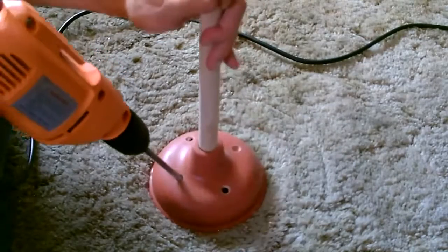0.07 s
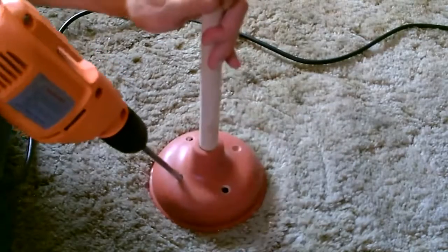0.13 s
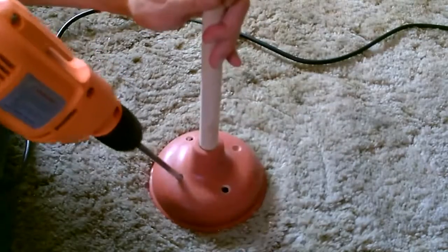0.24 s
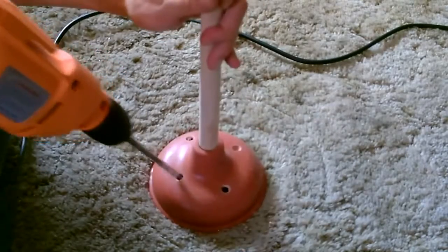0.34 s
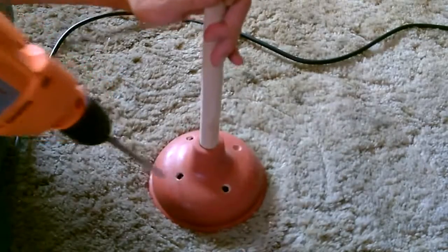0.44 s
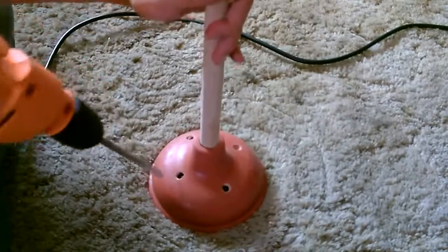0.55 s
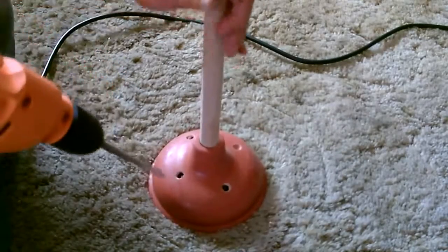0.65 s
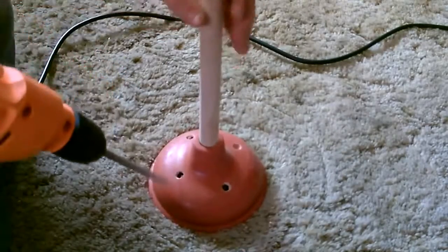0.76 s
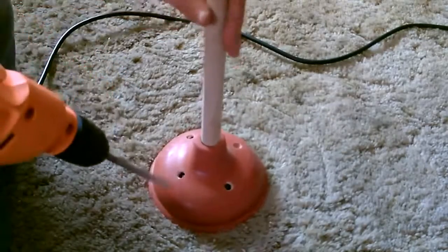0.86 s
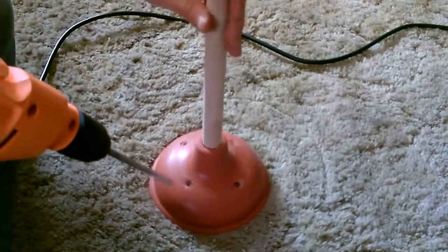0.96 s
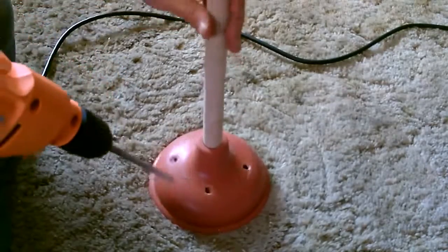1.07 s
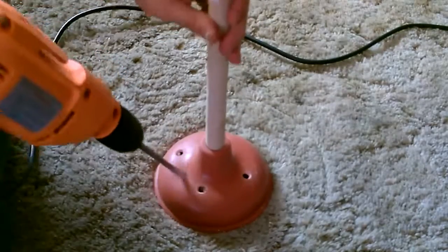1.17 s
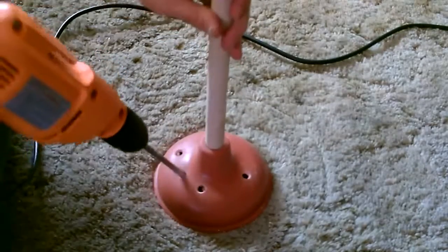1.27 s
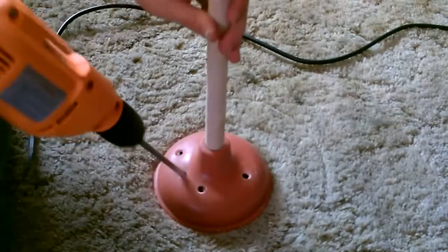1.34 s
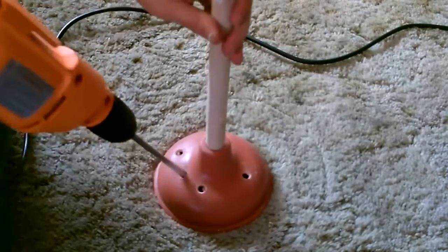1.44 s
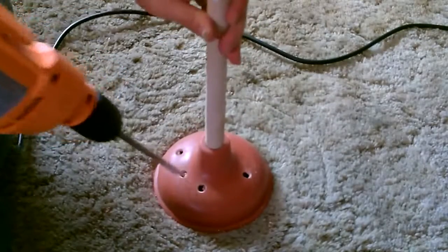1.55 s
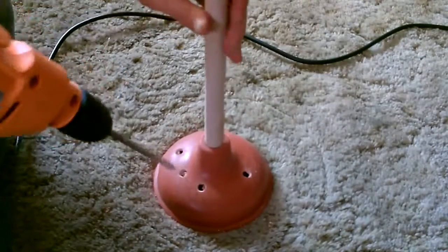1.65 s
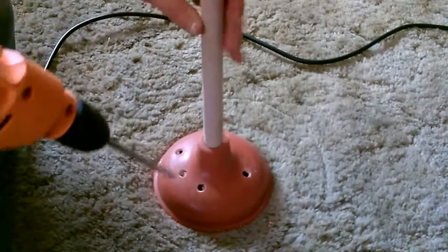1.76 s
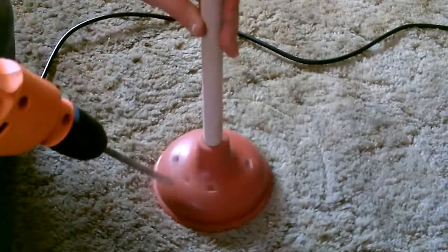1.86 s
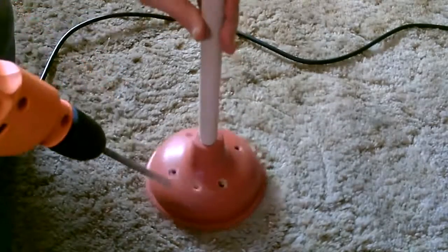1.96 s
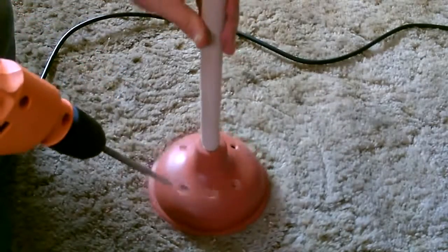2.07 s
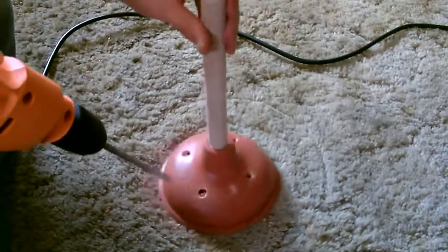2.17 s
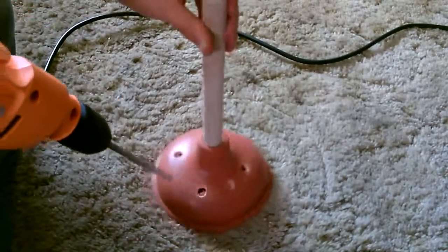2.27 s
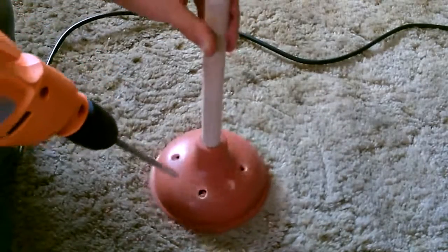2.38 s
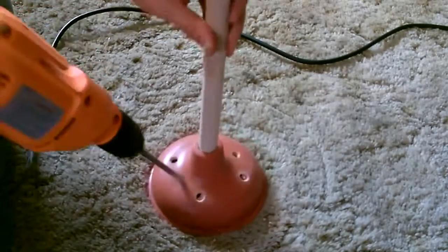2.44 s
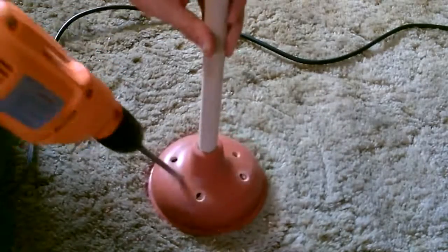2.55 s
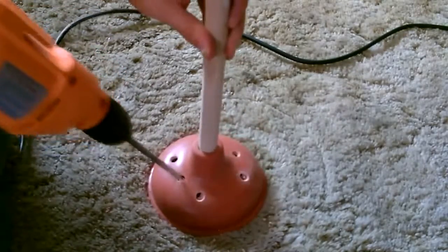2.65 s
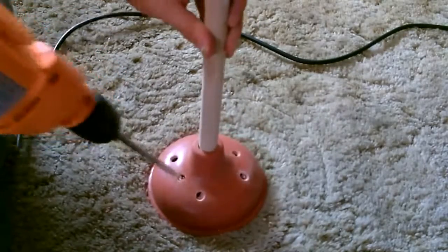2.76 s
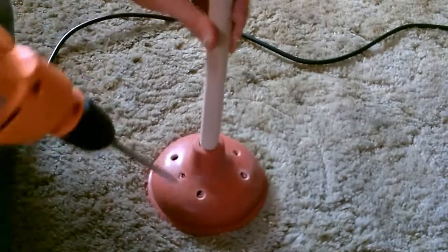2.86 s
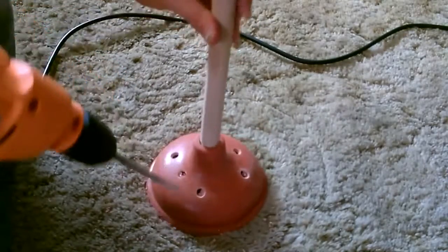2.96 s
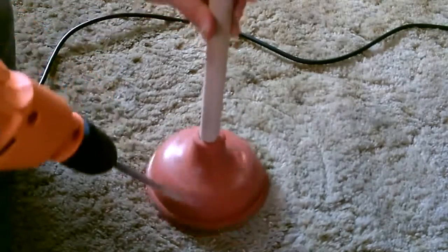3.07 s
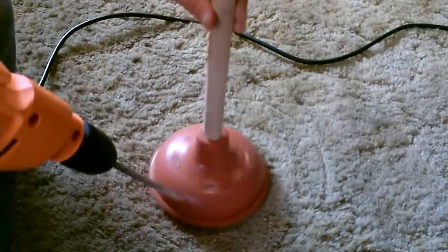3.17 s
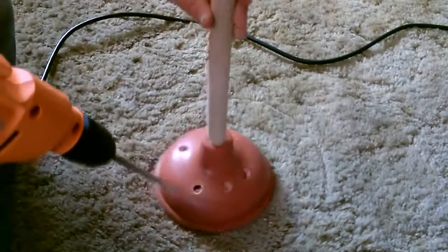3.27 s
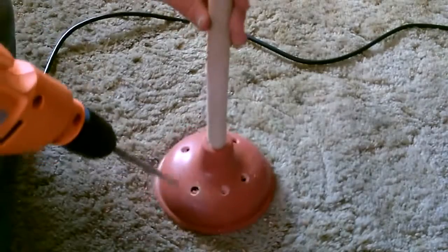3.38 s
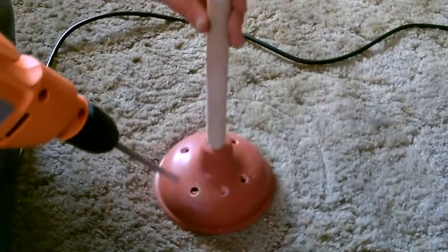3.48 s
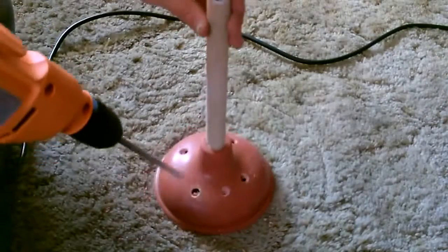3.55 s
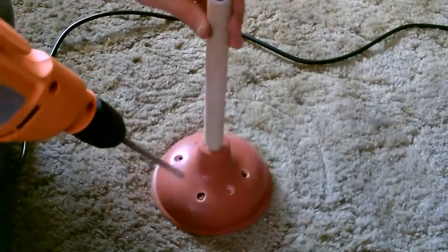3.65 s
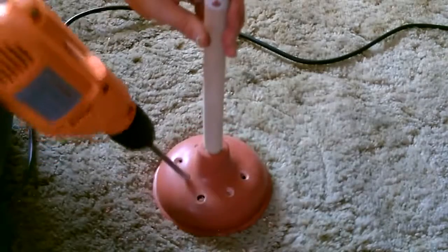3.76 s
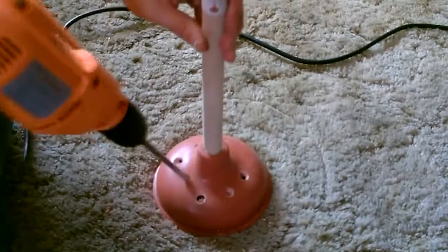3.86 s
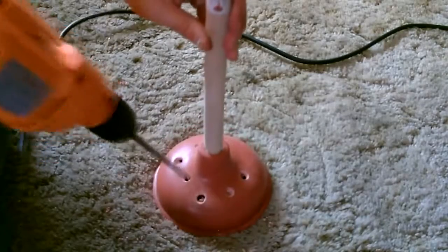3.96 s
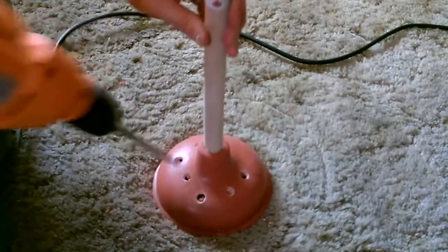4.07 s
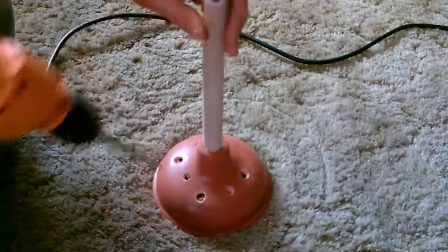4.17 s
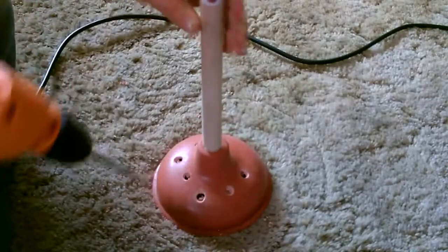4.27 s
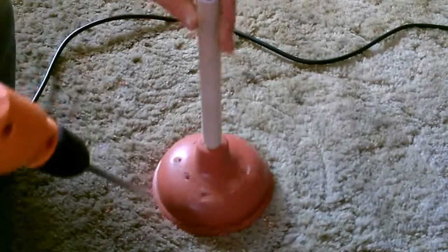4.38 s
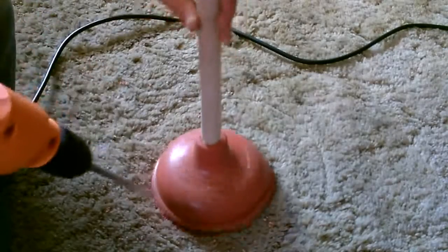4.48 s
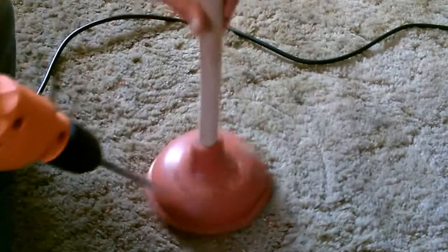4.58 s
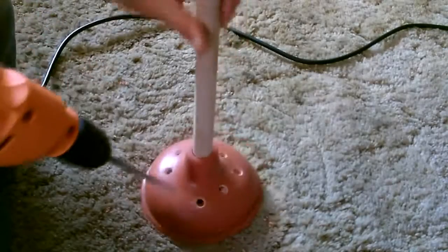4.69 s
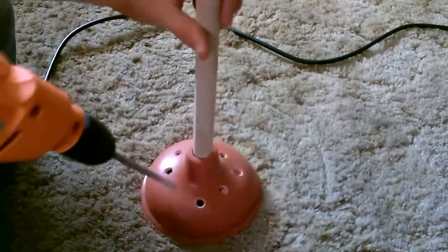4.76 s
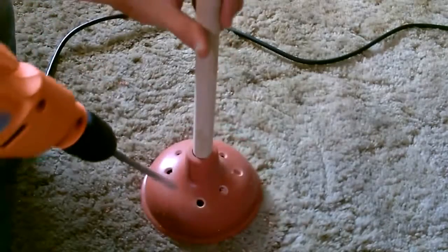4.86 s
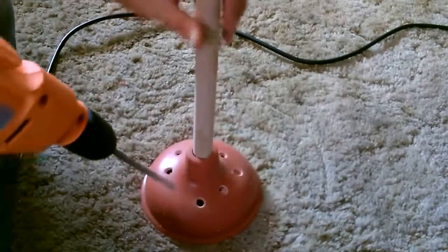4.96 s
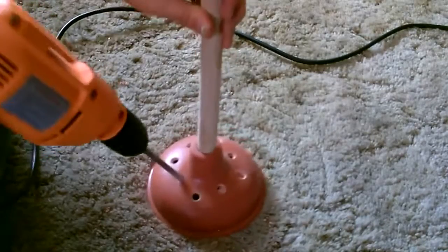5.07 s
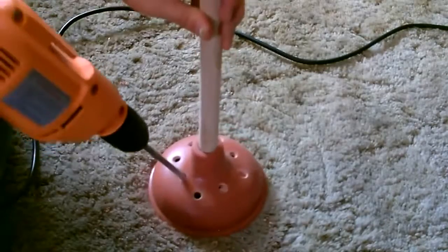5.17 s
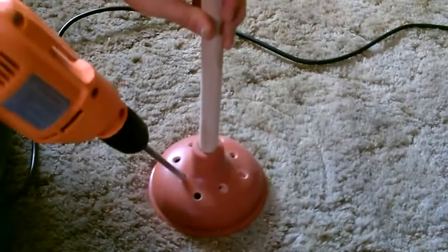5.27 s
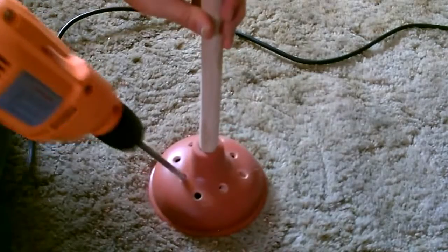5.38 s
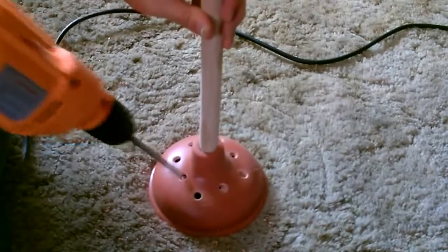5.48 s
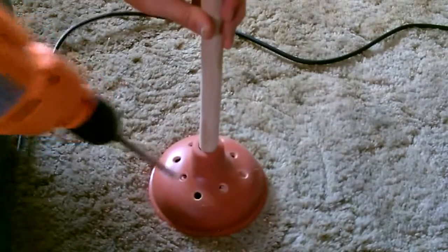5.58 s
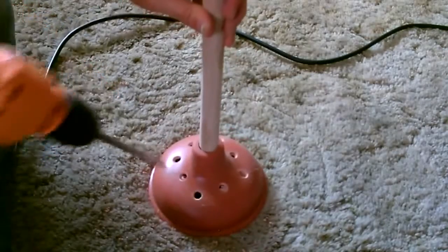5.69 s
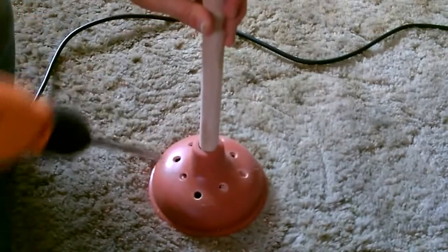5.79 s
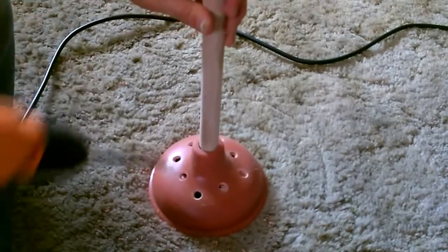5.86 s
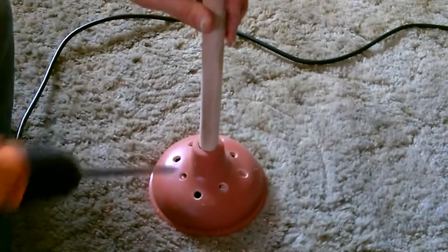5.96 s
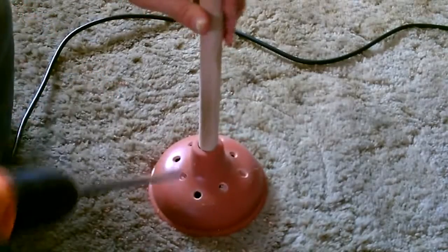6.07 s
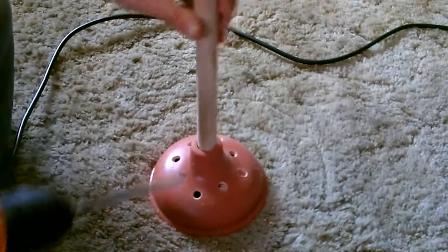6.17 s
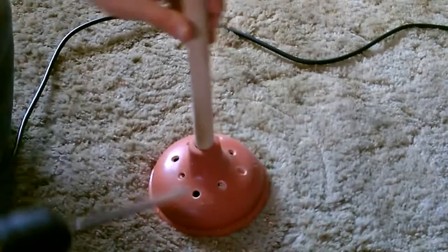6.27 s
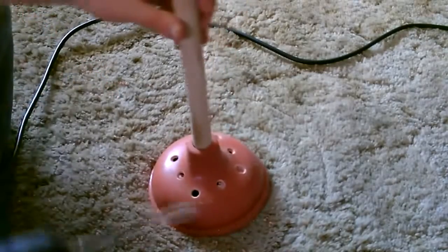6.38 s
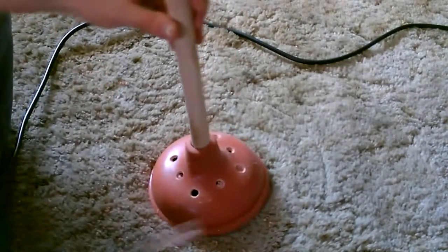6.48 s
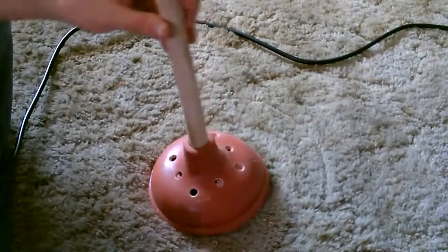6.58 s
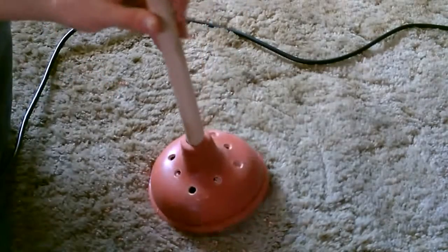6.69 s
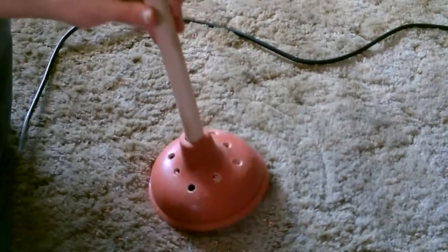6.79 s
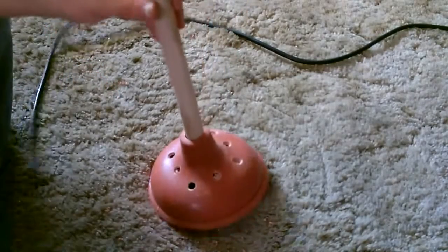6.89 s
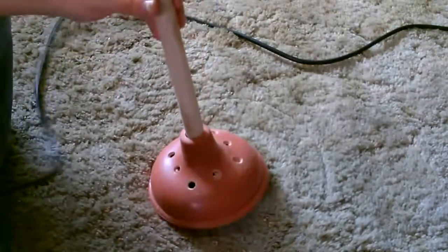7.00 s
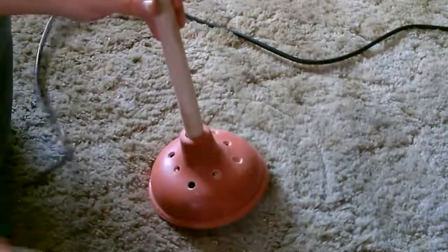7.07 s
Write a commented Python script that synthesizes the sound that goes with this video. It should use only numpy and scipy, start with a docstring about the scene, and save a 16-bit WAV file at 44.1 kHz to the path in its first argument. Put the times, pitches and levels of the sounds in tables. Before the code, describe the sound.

A corded electric drill runs five times, close to the microphone in a quiet carpeted room. Each run is a brief full-power whir with rushing air and hiss, followed by a longer coast in which the whine falls and loose gears rattle. Each new run cuts in abruptly before the motor has stopped. The last one winds down longest, sinking to a low whir and light ticking.

```python
"""A corded drill coasting down

A drill runs five times, close by on a carpet: full power for a moment, then a long coast.
As friction and air drag slow the rotor, its shaft orders whine downward and the loose gears rattle
over air, gear and brush noise in a quiet room. Each run is spliced hard onto the one before,
and a camera with a low sampling rate dulls the treble and mirrors it upward."""
import sys
import numpy as np
from scipy import signal
from scipy.fft import rfft, irfft, next_fast_len
from scipy.io import wavfile
from scipy.ndimage import uniform_filter1d, map_coordinates

SR = 44100
rng = np.random.default_rng(int(sys.argv[2]) if len(sys.argv) > 2 else 0)


def generate_wav(sig):
    """Save sig (samples, or channels by samples) to the path in sys.argv[1] as 16-bit PCM at SR."""
    pcm = np.round(np.clip(np.atleast_2d(sig).T, -1, 1) * 32767).astype(np.int16)
    wavfile.write(sys.argv[1], SR, pcm)


N = 314433

# Each row: start in seconds, trigger release in seconds, shaft speed under power in Hz,
# deceleration by friction in Hz per second.
RUNS = [(0, .4, 671.8, 206.1), (1.19, 1.5, 570, 207.9), (2.495, 2.7, 631, 200.4),
        (3.791, 3.98, 540.1, 196.3), (5.093, 5.52, 577.7, 195.9)]


def motor_noise(level_db):
    """Source and filter: cooling air, meshing gears and sparking brushes excite the plastic shell."""
    # Noise spectra. Each row: frequency in Hz, relative density in dB.
    air_spectrum = [(71, -78), (120, -43.5), (461, -10), (492, -9.5), (642, -6), (757, -6), (1090, -1),
                    (1620, -11), (1840, -5.5), (2500, -11.5), (3250, -41), (5500, -120)]
    gear_spectrum = [(820, -31), (1400, -0.5), (1930, -0.5), (2090, -1.5), (2560, 0), (2780, 3.5),
                     (3480, -11), (4090, 0), (4770, -5), (6430, -13.5), (8000, -11.5), (10400, -45),
                     (17600, -120)]
    brush_spectrum = [(2000, -33), (2700, 5.5), (3100, 12), (3700, 7.5), (4600, -0.5), (6000, -5),
                      (7000, -6.5), (8300, -12.5), (8600, 2), (9000, 5.5), (9600, -4), (11000, -17.5),
                      (11100, -72)]
    # Shell resonances. Each row: centre in Hz, width in Hz, gain in dB.
    modes = [(525, 18, 1), (755, 18, 5.5), (887, 40, 3.5), (1028, 88, 3.5), (1298, 18, 5),
             (1890, 140, -3.5), (2480, 77, -2.5), (3063, 60, 4.5), (3626, 230, 4.5), (5290, 740, 5.5)]
    roar_db, hiss_db, fizz_db = level_db[:3] + 0.65 * np.array([wobble(6), wobble(6), wobble(6)])
    roar = amp(roar_db - 2) * rush(air_spectrum, patchy_db=1.32, flutter_db=-0.7)
    hiss = amp(hiss_db - 4) * rush(gear_spectrum, patchy_db=2.5, flutter_db=1)
    fizz = amp(fizz_db + 8) * rush(brush_spectrum, patchy_db=2.1, flutter_db=1.5)
    shell = lambda hz: amp(sum(db / (1 + (2 * (hz - mid) / width) ** 2) for mid, width, db in modes))
    return filtered(roar + hiss + fizz, shell)


def whine(level_db):
    """Periodic forcing: blades and teeth sound at multiples of the shaft speed as the rotor coasts."""
    # Transmission out of the case. Each row: frequency in Hz, gain in dB.
    vents = [(250, -52), (480, -24), (1500, -26), (2300, -12), (3100, -6), (4000, -3), (4800, -3),
             (5400, -10), (6000, -18), (6800, -27), (9600, -31), (12000, -50)]
    # Fan overtones, then unbalance and tooth meshes. Each entry: shaft order, relative level in dB.
    fan_orders = {22: 0, 33: -1, 44: -3, 55: -8}
    gear_orders = {1: 13, 5: -1, 6: 6, 10: -1, 16: 2, 27: -6, 49: -8}
    blades, echo_s, lifted_s = 11, 1 / 730, 6.4
    fan_db, overtone_db, gear_db = level_db[3:]
    _, since_release, shaft_hz = rotor()
    turns = np.cumsum(shaft_hz) / SR
    t = np.arange(N) / SR
    reflection = 0.4 * np.clip((lifted_s - t) / 0.26, 0, 1)  # fades as the drill is lifted

    def floor_comb(order):
        """Interference with the floor's echo weakens evenly spaced frequencies."""
        return np.abs(1 - reflection * np.exp(2j * np.pi * order * shaft_hz * echo_s))

    def tone(order, db):
        """One shaft order, coloured by the case and wavering in level and phase."""
        gain = amp(db + along(vents, order * shaft_hz) + 1.8 * wobble(16))
        return gain * np.sin(2 * np.pi * order * turns + 0.75 * wobble(60))

    fan = floor_comb(blades) * tone(blades, fan_db)
    overtones = sum(floor_comb(k) * tone(k, overtone_db + db) for k, db in fan_orders.items())
    gears = sum(tone(k, gear_db + db) for k, db in gear_orders.items())
    coasting = np.clip(since_release / 0.057, 0, 1)
    return coasting * (fan + overtones + gears)


def gear_rattle(level_db):
    """Backlash: loose teeth give clear knocks and, between them, a fairly even, slowing rattle."""
    # Clear knocks. Each row: start in seconds, relative peak in dB, centre in Hz.
    knocks = [(0.1277, -11.5, 3060), (0.4454, -12, 2660), (0.4639, -20, 3240), (0.6986, -12.5, 3320),
              (0.7592, -26, 2600), (0.8335, -16.5, 2450), (0.8947, -19, 2810), (0.9717, -10, 3710),
              (1.0397, -14.5, 3710), (1.088, -10.5, 4000), (1.1314, -17.5, 4160), (1.2037, -7, 2980),
              (1.322, -6, 3260), (1.4292, -15, 3070), (1.6417, -12, 2970), (1.767, -13, 3120),
              (1.795, -14, 2790), (1.8146, -13, 2940), (1.836, -14, 2800), (1.9792, -12, 4140),
              (2.3105, -18.5, 2820), (2.3313, -16, 2710), (2.4797, -18.5, 3630), (2.4953, -12, 4100),
              (2.5374, -12, 3260), (2.7033, -10, 2450), (2.7515, -10.5, 3280), (2.7751, -17, 3570),
              (2.8929, -12, 2880), (2.9717, -16, 2920), (3.004, -11.5, 3930), (3.0294, -12.5, 3000),
              (3.056, -11, 3710), (3.1004, -12.5, 3660), (3.1218, -15, 3740), (3.1346, -7.5, 3070),
              (3.1588, -13, 2760), (3.177, -9.5, 3220), (3.1982, -15, 3800), (3.2184, -11, 3140),
              (3.2406, -14, 3820), (3.259, -12.5, 3170), (3.2865, -13, 4040), (3.5168, -14, 2840),
              (3.5726, -16.5, 2850), (3.6145, -16.5, 2560), (3.7414, -19, 2810), (3.7744, -20, 2650),
              (3.7915, -22, 3430), (3.8215, -7, 3050), (4.0178, -13, 3060), (4.078, -15, 2520),
              (4.1036, -7.5, 2920), (4.1266, -12, 2870), (4.2687, -22, 2700), (4.2856, -18, 4090),
              (4.302, -10, 3710), (4.4139, -12, 4170), (4.4324, -11, 4080), (4.5032, -14, 3800),
              (4.6898, -16, 2910), (4.7212, -15, 3120), (4.7387, -20, 3780), (4.811, -13.5, 2810),
              (4.9352, -18, 2790), (5.0964, -7, 3270), (5.172, -9, 3200), (5.4111, -11, 3030),
              (5.632, -12.5, 2980), (5.6546, -13, 2860), (5.6731, -15, 2970), (5.715, -18, 3020),
              (5.7334, -12.5, 2730), (5.8676, -13, 3710), (5.8871, -8, 3700), (5.9193, -16, 3390),
              (5.9868, -9.5, 3370), (6.0262, -12, 3280), (6.0467, -12.5, 4160), (6.1026, -11.5, 3960),
              (6.211, -14.5, 2870), (6.2343, -13, 4080), (6.2552, -17, 3090), (6.4368, -15.5, 3530),
              (6.4578, -17, 2800), (6.4874, -27, 2950), (6.5168, -25, 3790), (6.5338, -17, 3700),
              (6.5477, -20, 3040), (6.5846, -22.5, 2370), (6.6709, -19.5, 4200), (6.7044, -20.5, 3100),
              (6.7283, -26.5, 3680), (6.9109, -26, 2910), (6.9438, -26, 3170), (6.9688, -19, 2870),
              (7.0571, -30, 2490), (7.0805, -25, 2570), (7.101, -23, 2770)]
    # Each row: shaft speed in Hz, ticks per second.
    tick_rates = [(80, 36), (250, 42), (400, 54), (680, 52)]
    # Each row: shaft speed in Hz, dB added to the level curve of the gear hiss.
    tick_levels = [(80, 11), (200, 13), (300, 13), (400, 11.5), (500, 10.5), (600, 5.5)]
    scatter_s, spread_db, clearance_s = 0.002, 1.8, 0.011
    clear, ticks = np.zeros(N + SR), np.zeros(N + SR)
    for start, db, hz in knocks:
        knock = amp(db - 0.75) * tooth_knock(hz, t60=0.0082)
        clear[round(start * SR):][:len(knock)] += knock
    clear_starts = np.array(knocks)[:, 0]
    _, _, shaft_hz = rotor()
    tick_count = np.floor(np.cumsum(curves(tick_rates, shaft_hz)[0]) / SR)
    for start in np.flatnonzero(np.diff(tick_count)) / SR:
        late, size, pitch = rng.standard_normal(3)
        tick = amp(spread_db * size) * tooth_knock(3250 * np.exp(0.1 * pitch), t60=0.011)
        if np.abs(clear_starts - start).min() > clearance_s:
            onset = max(round((start + scatter_s * late) * SR), 0)
            ticks[onset:][:len(tick)] += tick
    tick_gain = amp(level_db[1] + curves(tick_levels, shaft_hz)[0])
    return clear[:N] + tick_gain * ticks[:N]


def tooth_knock(hz, t60):
    """Impact excitation: a tooth slaps back and housing modes near hz ring over a broad tick; peak 1."""
    # Modes of the gear housing in Hz.
    modes_hz = np.array([2146, 2474, 2867, 3207, 3740, 4073, 4730])
    noise = rng.standard_normal(600)
    t = np.arange(len(noise)) / SR
    sizes = amp(-32 * np.abs(np.log(modes_hz / hz)) + 3.5 * noise[:len(modes_hz)])
    phases = 3 * noise[-len(modes_hz):, None]
    ring = sizes @ np.sin(2 * np.pi * modes_hz[:, None] * t + phases)
    contact_band = signal.butter(4, [1100, 5200], btype="band", fs=SR, output="sos")
    contact = 0.5 * unit(signal.sosfilt(contact_band, noise))
    envelope = amp(-60 * t / t60) * (1 - np.exp(-t / 0.0007))
    burst = (ring + contact) * envelope
    return burst / np.abs(burst).max()


def rotor():
    """Friction and linear drag slow the shaft. Per sample: run, seconds since release, speed in Hz."""
    drag_per_s = 0.365  # air drag of the fan
    t = np.arange(N) / SR
    start, release, powered_hz, friction = np.transpose(RUNS)
    run = np.searchsorted(start, t, side="right") - 1
    since_release = t - release[run]
    friction_hz = friction[run] / drag_per_s
    decay = np.exp(-drag_per_s * np.maximum(since_release, 0))
    return run, since_release, (powered_hz[run] + friction_hz) * decay - friction_hz


def levels():
    """Radiation follows speed: relative dB of roar, hiss, fizz, fan tone, fan overtones, gear tones."""
    # Each row: shaft speed in Hz, then the six levels in dB while coasting.
    coasting = [(80, -66, -45.5, -72, -43, -54, -47), (153, -54.5, -38, -64, -37, -42, -52),
                (229, -46, -35, -51.5, -33, -43, -37.5), (293, -40.5, -32.5, -51, -34, -34, -46.5),
                (332, -37, -30, -48.5, -26.5, -41, -41.5), (365, -35, -31.5, -46, -28.5, -40, -36.5),
                (413, -31.5, -29.5, -45, -28, -39, -40.5), (510, -27.5, -26.5, -43, -32, -43, -46.5),
                (587, -24.5, -24.5, -38.5, -34, -41, -44), (680, -20, -23.5, -37.5, -35, -44, -42)]
    # The drill swings away. Each row: time in seconds, then dB added to the six coasting levels.
    swing = [(5.85, 1.9, 0.17, 0, 1, 4.5, 0.7), (6.05, 2.5, 2.5, 1, 5, 4, 8),
             (6.22, 3, -1.5, 3.5, -11, 15, 5), (6.35, 4.5, 1.5, -3.5, 11.5, 15, 12),
             (6.5, 5.5, 3.5, -1, -6, 19, -1), (6.63, 7, 2.5, 1, 9, 8, -4), (6.7, 4, 5, 2.5, -8, 1, -7),
             (6.95, 9, 3.5, 6, 4, 5, 0), (7.13, 1, 5, 7, 2, 0.1, 0)]
    # Under power. Each row, one per run: roar at the start, roar at release, hiss, fizz, all in dB.
    powered = [(-20.5, -18, -23, -33), (-22.5, -20, -22, -31.5), (-18.5, -19.5, -20, -31),
               (-21.5, -22, -25, -32), (-19.5, -22, -23, -32.5)]
    # Each row, one per run: lift of the fan tone in dB, lift of the gear tones at release in dB.
    tone_lifts = [(0, 10), (0, 1), (0, 5), (0, 3), (1.5, -3)]
    lead_s, fade_s = 0.04, 0.081  # power starts to fade just before release
    slack_db, slack_s, settle_s = -2.5, 0.11, 0.5
    run, since_release, shaft_hz = rotor()
    first_db, last_db, hiss_db, fizz_db = np.array(powered)[run].T
    fan_lift_db, gear_lift_db = np.array(tone_lifts)[run].T
    powered_s = np.array([release - start for start, release, *_ in RUNS])[run]
    roar_db = last_db + (last_db - first_db) * np.minimum(since_release, 0) / powered_s
    power_off = np.clip((since_release + lead_s) / fade_s, 0, 1)
    level_db = curves(coasting, shaft_hz) + curves(swing, np.arange(N) / SR)
    # Hiss and fizz dip while the gears unload.
    level_db[1:3] += slack_db * np.exp(-np.maximum(since_release, 0) / slack_s)
    level_db[:3] = power_off * level_db[:3] + (1 - power_off) * [roar_db, hiss_db, fizz_db]
    level_db[3] += fan_lift_db
    level_db[5] += gear_lift_db * np.clip(2 - 2 * since_release / settle_s, 0, 1)
    return level_db


def room_hum():
    """Ambient noise: a quiet, fluttering band, strongest in the low midrange."""
    # Each row: frequency in Hz, relative density in dB.
    spectrum = [(15, -71), (25, -45), (70, -44), (248, -17), (484, -10), (537, -13), (626, 0.5),
                (810, -12.5), (1500, -15.5), (1950, -27.5), (3300, -120)]
    return amp(-54.5) * rush(spectrum, patchy_db=3, flutter_db=4.7)


def rush(spectrum, patchy_db, flutter_db):
    """Modulated noise of rms 1: random patches of gain in time and frequency, and a fast flutter."""
    bins = signal.stft(rng.standard_normal(N), nperseg=512)[2]
    patches = uniform_filter1d(rng.standard_normal(bins.shape), size=4, axis=0)
    patches = uniform_filter1d(patches, size=7, axis=1)
    noise = signal.istft(bins * amp(patchy_db * unit(patches)), nperseg=512)[1][:N]
    flutter = amp(flutter_db * wobble(120))
    return unit(filtered(flutter * noise, lambda hz: amp(along(spectrum, hz))))


def wobble(rate):
    """A smooth random curve with rate knots per second."""
    knots = rng.standard_normal(int(N * rate / SR) + 4)
    return map_coordinates(knots, [np.arange(N) * rate / SR])


def filtered(x, response):
    """Zero-phase filtering: the spectrum of x times response(hz)."""
    size = next_fast_len(N + SR // 2)
    return irfft(rfft(x, size) * response(np.fft.rfftfreq(size, 1 / SR)), size)[..., :N]


def along(points, hz):
    """Interpolation of (Hz, value) points on a logarithmic frequency axis."""
    point_hz, values = np.transpose(points)
    return np.interp(np.log(hz + 1), np.log(point_hz + 1), values)


def curves(rows, at):
    """Linear interpolation of each later column against the first."""
    axis, *columns = np.transpose(rows)
    return np.array([np.interp(at, axis, column) for column in columns])


def amp(db):
    """Amplitude ratio of a level in dB."""
    return 10 ** (np.asarray(db) / 20)


def unit(x):
    """Normalisation to rms 1."""
    return x / np.sqrt(np.mean(x ** 2) + 1e-20)


def scene():
    """Superposition of the drill and the room in one channel."""
    level_db = levels()
    return (motor_noise(level_db) + whine(level_db) + gear_rattle(level_db) + room_hum())[None]


def record(dry):
    """Spectral imaging: the camera dulls the treble and mirrors it about SR / 4; splices dip to zero."""
    # Leak of the mirrored band. Each row: frequency in Hz, gain in dB.
    leak = [(10900, -85), (11100, 17.5), (12300, -11), (13400, -31.5), (13700, -38), (15800, -39)]
    # Each row: time, fade-out and fade-in, all in seconds.
    splices = [(1.1882, 0.0053, 0.0056), (2.494, .003, 0.0025), (3.79, 0.0029, .0003),
               (5.092, 0.004, .0003)]
    bass_hz, edge_hz, top_hz = 130, 9620, 17000  # the small microphone also loses bass
    dull = filtered(dry, lambda hz: np.where(hz < edge_hz, 1, amp(-24) * (hz < SR / 4)))
    mirrored = dull * (-1.) ** np.arange(N)  # swaps f and SR / 2 - f
    sound = dull + filtered(mirrored, lambda hz: amp(along(leak, hz)) * (hz < 15800))
    t = np.arange(N) / SR
    for at, out_s, in_s in splices:
        sound *= np.clip(np.maximum((at - t) / out_s, (t - at) / in_s), 0, 1)
    return filtered(sound, lambda hz: (hz < top_hz) * hz / np.hypot(hz, bass_hz))


dry = scene()
out = record(dry)
generate_wav(out)
```